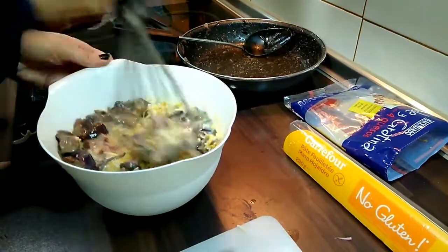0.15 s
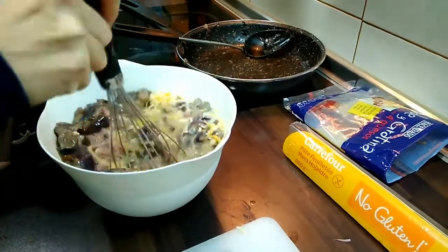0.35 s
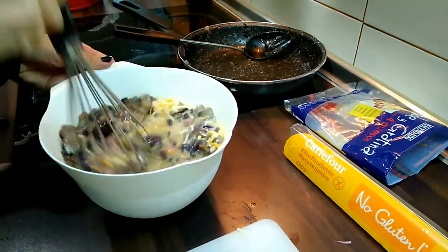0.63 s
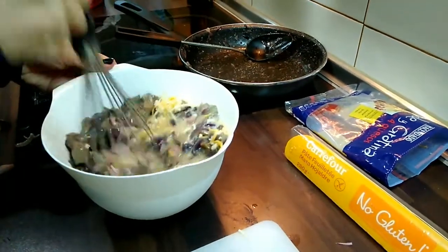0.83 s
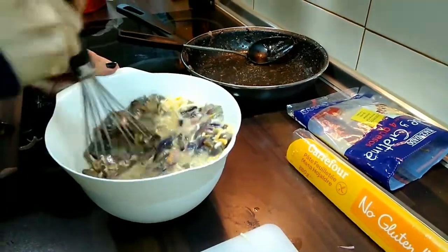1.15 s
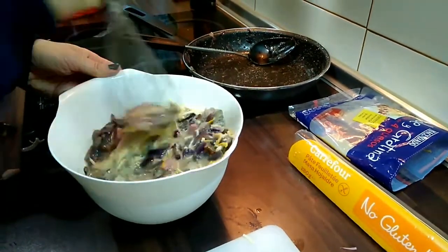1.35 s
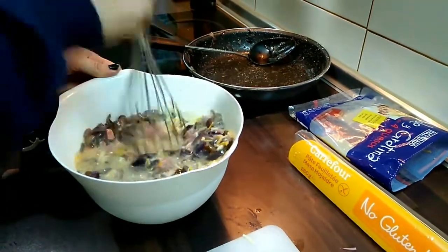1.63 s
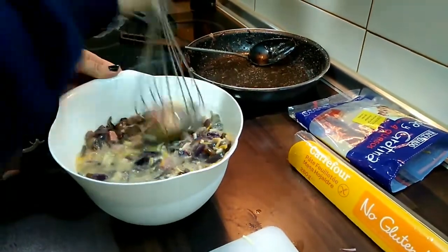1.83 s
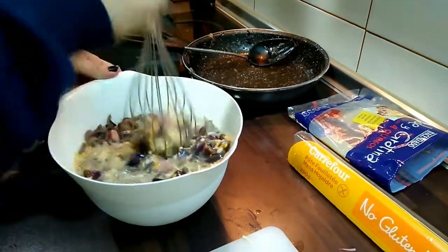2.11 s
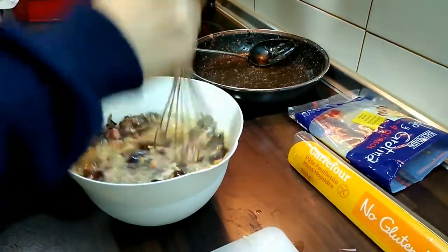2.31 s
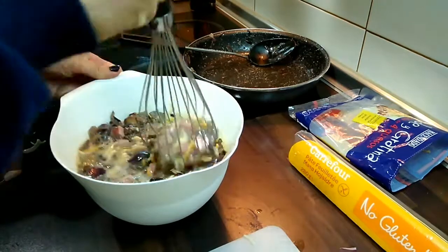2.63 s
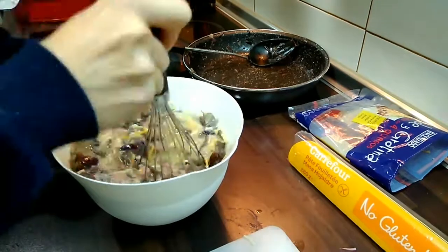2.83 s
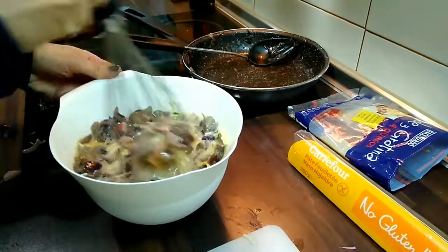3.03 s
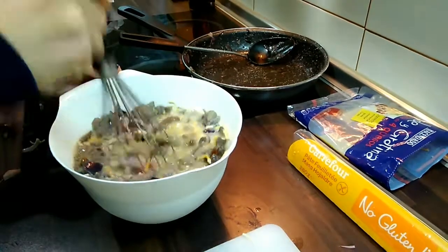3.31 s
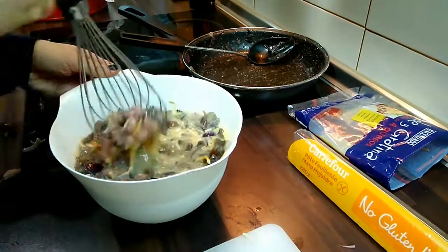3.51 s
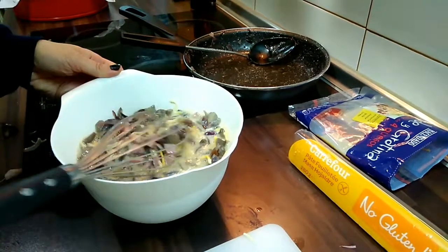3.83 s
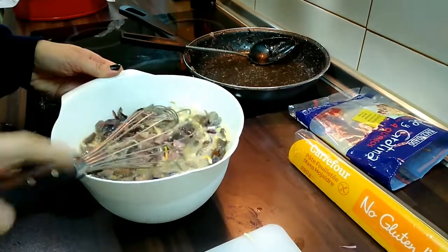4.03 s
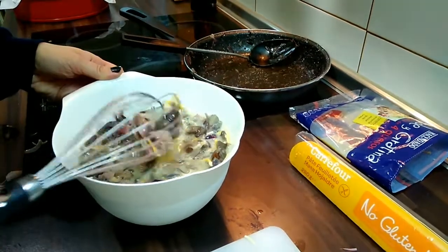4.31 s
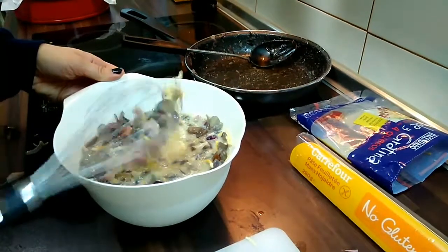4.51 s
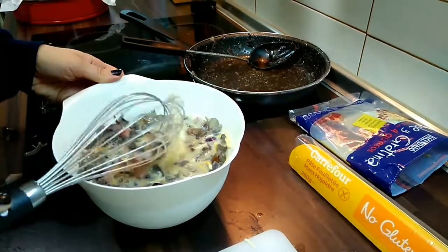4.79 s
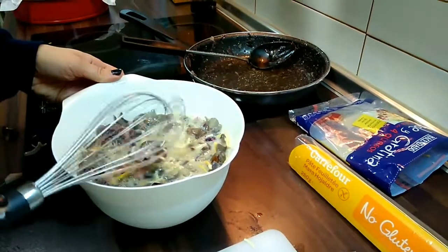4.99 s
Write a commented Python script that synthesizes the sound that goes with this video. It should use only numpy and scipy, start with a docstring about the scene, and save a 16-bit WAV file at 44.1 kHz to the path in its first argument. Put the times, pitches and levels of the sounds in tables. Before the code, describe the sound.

A wire whisk stirs thick egg mixture with sparse light clicks and soft squelches, then is tapped sharply on the plastic bowl's rim over a faint hum.

```python
"""A wire whisk turns a thick egg mixture in a plastic bowl on a kitchen worktop.
Wires tick (chattering noise bursts through resonances), rub (trains of tiny slips) and squelch (air pops).
Later the whisk is tapped clean on the rim, and after the first tap its handle is laid there: the bowl
knocks and rocks, the wire cage rings (dying sines), and hard blows shove the bowl (bass pulses). Noise
echoes make the small tiled room; steady sines make an appliance hum over faint air noise."""
import sys
import numpy as np
from scipy import signal
from scipy.fft import rfft, irfft
from scipy.io import wavfile

SR = 44100
rng = np.random.default_rng(int(sys.argv[2]) if len(sys.argv) > 2 else 0)


def wrap_up_sound(samples):
    """Save the sound to the file named by the first command line argument, as 16-bit audio."""
    columns = np.atleast_2d(samples).T
    # keep every value between -1 and 1, then stretch to whole-number steps
    tamed = np.clip(columns, -1, 1)
    steps = np.round(tamed * 32767).astype(np.int16)
    wavfile.write(sys.argv[1], SR, steps)


N = 227538
TIME = np.arange(N) / SR

# light and hard touches of single wires: on the wall while stirring, rattling on the rim between taps;
# ring and tick are relative to the clack:
# [time_s, clack_db, bowl_ring_db, tick_db, left_minus_right_db]
WIRE_TOUCHES = [(0.078, -62, -13, -14, -9), (0.762, -56, -10, 3, -2), (0.774, -48, -19, -2, -15),
                (0.779, -43.5, -7.5, 3, -4), (0.8428, -45, -11.5, -9, -3), (1.172, -31.5, -1.5, -1, -2.5),
                (1.211, -45.5, 3.5, 2, -3), (1.457, -61.5, -7, 5, -12), (1.541, -56.5, -3, -9, -2),
                (1.597, -54.5, -28, -11, -2), (1.7017, -60, 1, 1.5, 2), (2.001, -48.5, 4, 10.5, -24),
                (2.013, -38, -15, 2.5, -1), (2.438, -31, -3.5, 5, -5.5), (2.851, -51, -7, -0.5, -0.5),
                (3.254, -48, -13, 0, -2), (3.274, -39.5, -9.5, 0.5, -3.5), (3.412, -66, -12, 8, -19),
                (3.7505, -62, 7.5, -3, 1), (3.768, -45, -13, 0.5, -18), (3.774, -44, -15, 7, -2),
                (4.557, -42, 6.5, -6, -14.5), (4.651, -60.5, -9, 7, 4), (4.737, -33.5, 8, 8, -3),
                (4.859, -46, -19, 5, 5), (5.084, -49.5, -20, 9, -14)]
# the whisk tapped on the rim: [time_s, strength_db, brightness_db, weight_on_bowl_db]
RIM_TAPS = [(3.8902, -37, -3, -31), (4.409, -40.5, -2.5, -31), (4.549, -34, 2, -31.5),
            (4.7057, -24.5, -1.5, 0), (4.816, -28, -0.5, -4), (4.941, -30.5, -2, -6),
            (5.044, -38.5, 1, -19.5), (5.1493, -25, 2.5, -6.5)]
# resonances of the bowl: [centre_hz, width_hz, level_db]
BOWL_RESONANCES = [(694, 120, -14.5), (1051, 90, -13), (1298, 160, -8), (1797, 266, -2), (2293, 286, -0.5),
                   (2930, 280, -6)]
# resonances of the wire's clack: [centre_hz, width_hz, level_db]
CLACK_RESONANCES = [(3390, 530, -3.5), (4147, 474, -1), (4800, 690, -1.5), (5960, 2170, -4),
                    (7100, 1090, 0), (8510, 800, 0)]
# resonances of the wire's thin tick: [centre_hz, width_hz, level_db]
TICK_RESONANCES = [(9380, 530, -5.5), (10500, 540, -3.5), (11100, 580, -1), (12320, 980, 0.5),
                   (13970, 1140, -2), (15090, 610, -4)]
# the handle is laid on the rim
LANDING_S = 4.136
# knock and shove lose this many dB per dB of weight missing from a tap
THUD_GROWTH = 2.5


def from_db(db):
    """Decibels to gain."""
    return 10 ** (np.asarray(db) / 20)


def rms_one(x):
    """Scale to rms 1."""
    return x / np.sqrt(np.mean(x ** 2) + 1e-20)


def at_hz(points, hz):
    """Read a table on a log-frequency axis."""
    f, value = np.transpose(points)
    return np.interp(np.log(np.maximum(hz, 1)), np.log(f), value)


def add(out, s, sound):
    """Mix a short sound into out from time s on."""
    start = max(round(s * SR), 0)
    out[..., start:start + sound.shape[-1]] += sound[..., :max(N - start, 0)]


def resonate(x, modes):
    """Parallel two-pole resonances of alternating sign."""
    out = 0
    for k, (hz, width, db) in enumerate(modes):
        r = np.exp(-np.pi * width / SR)
        poles = [1, -2 * r * np.cos(2 * np.pi * hz / SR), r * r]
        zeros = np.array([1, 0, -1]) * (1 - r * r) / 2
        out = out + (-1) ** k * from_db(db) * signal.lfilter(zeros, poles, x)
    return out


def strike(modes, count):
    """The dying sines that one blow sets off, count samples long, with their time axis."""
    t = np.arange(count) / SR
    return t, sum(from_db(db - 60 * t / t60) * np.sin(2 * np.pi * hz * t) for hz, db, t60 in modes)


def two_ports(shared, own, likeness, lag=0):
    """Stereo from a shared signal, late on the left by lag samples, and a part of each side's own."""
    likeness = np.clip(likeness, 0, 1)
    n = np.arange(len(shared))
    late_left = np.interp(n - round(lag), n, shared, left=0)
    return np.sqrt(likeness) * np.stack([late_left, shared]) + np.sqrt(1 - likeness) * own


def panned(pan_db):
    """Left and right gains of constant power; positive dB leans left."""
    return rms_one(from_db(np.array([[pan_db], [-pan_db]]) / 2))


def swell(start, length, peak_share):
    """Pressure of one stroke: up to its strongest moment and down again."""
    return np.interp((TIME - start) / length, [0, np.clip(peak_share, 0, 1), 1], [0, 1, 0])


def grains(per_s, spread_db):
    """Random tiny stereo impulses; a spread above 0 dB makes their sizes uneven."""
    sizes = from_db(spread_db * np.minimum(rng.exponential(1, (3, N)), 4))
    sizes = sizes * rng.choice([-1, 1], (3, N))
    train = sizes * (rng.random((3, N)) < per_s / SR) + 1e-18
    return two_ports(train[0], train[1:], likeness=0.2, lag=4)


def even(x, share):
    """Spread the energy of a burst more evenly over pitch; share 1 is quite flat."""
    spectrum = rfft(x)
    return irfft(spectrum / (np.abs(spectrum) + 1e-9) ** np.clip(share, 0, 1), x.shape[-1])


def background():
    """An appliance hums mostly at twice the mains rate, over faint air noise that is mono in the bass."""
    # hum partials: [pitch_hz, rms_db]
    hum_partials = [(50, -90.5), (100, -58), (295, -84.5), (344, -100.5), (442, -88.5), (617, -89)]
    # spectrum shape of the still air: [frequency_hz, relative_db_per_hz]
    air_spectrum = [(25, -14), (50, 2.5), (90, -1), (160, -5.5), (300, -10), (720, -11), (900, -15),
                    (1900, -20), (3000, -24.5), (7000, -26.5), (15000, -23), (16000, -35.5)]
    air_db = -72
    hum = 0
    for hz, db in hum_partials:
        hum = hum + from_db(db) * np.sqrt(2) * np.sin(2 * np.pi * (hz * TIME + rng.random()))
    hz = np.fft.rfftfreq(N, 1 / SR)
    white = rfft(rng.standard_normal((3, N)))
    # share of the air noise common to both sides, by Hz
    alike = np.clip(at_hz([(130, 1.0), (640, 0.54), (1400, 0.023)], hz), 0, 1)
    stereo = np.sqrt(alike) * white[0] + np.sqrt(1 - alike) * white[1:]
    air = irfft(stereo * from_db(at_hz(air_spectrum, hz)), N)
    return hum + from_db(air_db) * rms_one(air)


def kitchen(x, wet_db=-3.5, first_echo_s=0.0032, near_db=9.0, near_s=0.02, pan_db=-0.5):
    """Dense early echoes from worktop and tiles, then a short tail; each band dies at its own rate."""
    # reverberation time: [frequency_hz, t60_s]
    room_t60 = [(150, 0.85), (700, 0.2129), (2000, 0.1977), (6000, 0.3249), (11000, 0.1944), (16000, 0.31)]
    # reverberation colour: [frequency_hz, relative_level_db]
    room_colour = [(60, -17.5), (200, -0.5), (700, 4), (2000, -1.5), (6000, -3), (11000, -1), (16000, -2)]
    t, response = np.arange(SR // 2) / SR, 0
    edges = np.geomspace(60, 18000, 13)
    white = rng.standard_normal((2, 2, 2, len(t)))
    for k, band in enumerate(zip(edges, edges[1:])):
        hz = np.sqrt(band[0] * band[1])
        band_filter = signal.butter(2, band, "band", fs=SR, output="sos")
        noise = signal.sosfilt(band_filter, white[k % 2])
        response = response + noise * from_db(at_hz(room_colour, hz) - 60 * t / at_hz(room_t60, hz))
    build_up = 1 - np.exp(-(t / first_echo_s) ** 2)
    early_boost = 1 + from_db(near_db) * np.exp(-t / near_s)
    response = response * build_up * early_boost
    response = response / np.sqrt(np.sum(response ** 2) / 2)
    # each side of the bowl reaches each output side by paths of its own
    echoes = signal.fftconvolve(x[None], response, axes=2).sum(axis=1)[:, :N]
    return from_db(wet_db) * panned(pan_db) * echoes


def rocking(build_s=0.024, delay_s=0.0048, landing_db=-56.0, tap_db=-25.5, pan_db=3.5):
    """After a blow the full bowl builds up a low wobble over a few cycles, which then dies."""
    # slow modes of the bowl on its base: [pitch_hz, relative_level_db, t60_s]
    rock_modes = [(68.3, 0, 0.12), (127, -15.5, 0.12), (166, -21, 0.17)]
    out = np.zeros(N)
    t, wobble = strike(rock_modes, count=SR // 2)
    wobble = wobble * (1 - np.exp(-(t / build_s) ** 3))
    wobble = wobble / np.abs(wobble).max()
    blows = [(LANDING_S, landing_db)] + [(s, tap_db + weight) for s, *_, weight in RIM_TAPS]
    for s, db in blows:
        add(out, s + delay_s, from_db(db) * wobble)
    return out * panned(pan_db)


def knocks(rise_s=0.0019, landing_db=-31, tap_db=-41, pan_db=2.0):
    """The landing handle and the weighty taps start softly and wake the low modes of the bowl."""
    # low modes of the bowl under a dull blow: [pitch_hz, relative_level_db, t60_s]
    knock_modes = [(167.92, -15, 0.124), (249, -10, 0.072), (384, -10, 0.064), (552, -6.5, 0.028),
                   (607, 3, 0.025), (686, -30, 0.027), (1320, -0.5, 0.0072)]
    out = np.zeros(N)
    t, ring = strike(knock_modes, count=SR // 3)
    soft_ring = ring * (1 - np.exp(-t / rise_s))
    blows = [(LANDING_S, landing_db)]
    blows += [(s, tap_db + THUD_GROWTH * weight) for s, *_, weight in RIM_TAPS]
    for s, db in blows:
        add(out, s, from_db(db) * soft_ring)
    return out * panned(pan_db)


def shoves(push_s=0.0002, late_s=0.00093, wire_db=-7.5, wire_from_db=-38.5, tap_db=-27.5, pan_db=-4.5):
    """A hard shove gives one short, one-sided pressure pulse that reaches into the bass and rings the base."""
    # resonances of the loaded base of the bowl: [centre_hz, width_hz, level_db]
    base_resonances = [(609, 64, -10.5), (1150, 250, 15)]
    out, t = np.zeros(N), np.arange(SR // 100) / SR
    # a single wire shoves the bowl only when it strikes hard enough
    by_wire = [(s, db + wire_db) for s, db, *_ in WIRE_TOUCHES if db > wire_from_db]
    by_tap = [(s, tap_db + THUD_GROWTH * weight) for s, *_, weight in RIM_TAPS]
    pulse = t / push_s * np.exp(1 - t / push_s)
    for s, db in by_wire + by_tap:
        add(out, s + late_s, -from_db(db) * pulse)
    return (out + resonate(out + 1e-18, base_resonances)) * panned(pan_db)


def squelches(width_share=0.73, peak_share=0.29):
    """Small air pockets pop in the cavity that the wires open in the mixture."""
    # the mixture sucking at the wires: [start_s, length_s, level_db, centre_hz]
    sucks = [(0.359, 0.05, -70, 2480), (1.46, 0.057, -69, 1270), (1.534, 0.024, -57, 1290),
             (1.698, 0.016, -53.5, 1390), (1.775, 0.084, -68.5, 2320), (2.001, 0.009, -46.5, 1870),
             (2.664, 0.055, -59.5, 1400), (2.706, 0.023, -55, 1670), (2.848, 0.016, -56, 1440),
             (2.928, 0.016, -67.5, 1980), (3.746, 0.026, -51, 1390)]
    pops, out = grains(per_s=1300, spread_db=4.5), 0
    for start, length, db, hz in sucks:
        cavity = [(hz, width_share * hz, 0)]
        hollow = resonate(resonate(resonate(pops, cavity), cavity), cavity)
        out = out + from_db(db) * swell(start, length, peak_share) * rms_one(hollow)
    return out


def rubs(level_db=-3.5, pan_db=-0.5, snag_db=10.0, peak_share=0.29, ring_db=-5, tick_db=3.5):
    """Sliding wires slip thousands of times a second, snag now and then, and ring bowl and wire."""
    # wires sliding on the bowl: [start_s, length_s, relative_level_db, brightness_db]
    slides = [(-0.03, 0.1, -61.5, -0.5), (0.327, 0.12, -69.5, -1), (0.759, 0.052, -50.5, -1.5),
              (1.429, 0.11, -69.5, -1.5), (1.492, 0.2, -67, -0.5), (1.683, 0.054, -70, 4),
              (1.907, 0.08, -55, -0.5), (1.993, 0.052, -47, -1.5), (2.425, 0.036, -43, 3),
              (2.838, 0.093, -61, 2.5), (3.249, 0.12, -61, 0.5), (3.738, 0.16, -58, 4),
              (3.839, 0.17, -52, 3), (3.953, 0.36, -69.5, 0), (4.236, 0.066, -53.5, 4),
              (4.479, 0.13, -67, 2.5), (4.713, 0.043, -34.5, -2)]
    snags = from_db(snag_db) * grains(per_s=110, spread_db=1.5)
    slips, out = grains(per_s=4700, spread_db=0.0) + snags, 0
    # a bright slide rings the bowl less and ticks more
    parts = ((BOWL_RESONANCES, ring_db, -1), (CLACK_RESONANCES, 0, 0), (TICK_RESONANCES, tick_db, 1))
    for modes, part_db, tilt in parts:
        pressure = 0
        for start, length, db, bright in slides:
            gain = from_db(db + part_db + tilt * bright)
            pressure = pressure + gain * swell(start, length, peak_share)
        out = out + pressure * rms_one(resonate(slips, modes))
    return from_db(level_db) * panned(pan_db) * out


def cage(level_db=-17, weight_growth=0.079, uneven_db=4.0, detune=0.0085):
    """Clear of the food, the wire loops sing on briefly after each tap, centred between left and right."""
    # free wire loops: [pitch_hz, relative_level_db, t60_s]
    loop_modes = [(1762, 9.5, 0.089), (1910, -14, 0.11), (2070, -0.5, 0.17), (2380, 3.5, 0.12),
                  (2536, 7.5, 0.14)]
    out = np.zeros(N)
    for s, strength, bright, weight in RIM_TAPS:
        # each new resting point shifts the pitch and strength of the loops
        loops = [(hz * (1 + detune * rng.normal()), db + uneven_db * rng.normal(), t60)
                 for hz, db, t60 in loop_modes]
        _, ring = strike(loops, count=SR // 2)
        add(out, s, from_db(strength - bright + level_db + weight_growth * weight) * ring)
    return out * panned(0)


def contacts():
    """Every wire contact: (time_s, bowl_ring_db, clack_db, tick_db, chatter_ms, left_minus_right_db)."""
    touch_chatter_ms, tap_chatter_ms = 1.38, 2.15
    # in a tap the bowl rings freely: levels against the clack
    tap_ring_db, tap_tick_db = 2, 4
    # a second wire lands just after the first, harder the more weight the tap carries
    second_late_s, second_db, second_db_per_weight_db = 0.0022, -4.5, 0.41
    first_pan_db, second_pan_db = -7.0, 2
    for s, db, ring_db, tick_db, pan_db in WIRE_TOUCHES:
        yield s, db + ring_db, db, db + tick_db, touch_chatter_ms, pan_db
    for s, strength, bright, weight in RIM_TAPS:
        second = strength + second_db + second_db_per_weight_db * weight
        wires = ((s, strength, first_pan_db), (s + second_late_s, second, second_pan_db))
        for at, db, pan_db in wires:
            # bright taps tick more and ring less
            yield at, db + tap_ring_db - bright, db, db + tap_tick_db + bright, tap_chatter_ms, pan_db


def clicks(rise_s=0.0003, linger_s=0.0047, linger_db=-20, evenness=0.95, clack_hz=5410, clack_width_hz=3000):
    """A wire chatters on wall or rim for a millisecond or two and sets bowl and wire ringing."""
    # a short lead-in ahead of the contact leaves room for the evened burst to spread
    out, lead_s = np.zeros((2, N)), 0.0025
    t = np.maximum(np.arange(SR // 20) / SR - lead_s, 0)
    attack = (t > 0) & (t < 0.004)   # levels hold over these first milliseconds
    rise = 1 - np.exp(-(t / rise_s) ** 2)
    linger = from_db(linger_db) * np.exp(-t / linger_s)
    for s, bowl_db, clack_db, tick_db, chatter_ms, pan_db in contacts():
        chatter = np.exp(-1000 * t / chatter_ms)
        contact = rise * (chatter + linger)
        # each burst is evened over pitch before it drives the resonances
        noise = even(rng.standard_normal((3, len(t))) * contact, evenness)
        force = two_ports(noise[0], noise[1:], likeness=0.3, lag=4)
        # the wire clacks most in the middle of its range
        bending = resonate(force, [(clack_hz, clack_width_hz, 0)])
        parts = ((force, BOWL_RESONANCES, bowl_db), (bending, CLACK_RESONANCES, clack_db),
                 (force, TICK_RESONANCES, tick_db))
        for drive, modes, db in parts:
            ring = resonate(drive, modes)
            ring = ring / ring[:, attack].std(axis=1, keepdims=True)
            add(out, s - rise_s - lead_s, from_db(db) * panned(pan_db) * ring)
    return out


def scene():
    """Whisk and bowl in the room, with the rocking dry, over the hum."""
    whisk = clicks() + cage() + rubs() + squelches() + shoves() + knocks()
    return whisk + kitchen(whisk) + rocking() + background()


def record(dry):
    """A steep low-pass cuts the top above 16.2 kHz."""
    low_pass = signal.ellip(10, 0.2, 70, 16200, fs=SR, output="sos")
    return signal.sosfilt(low_pass, dry)


dry = scene()
out = record(dry)
wrap_up_sound(out)
```